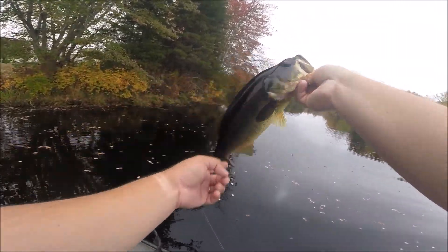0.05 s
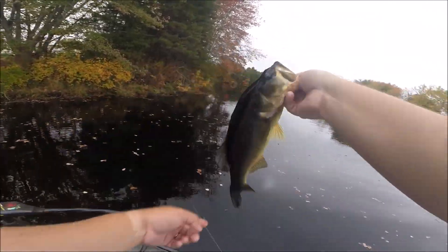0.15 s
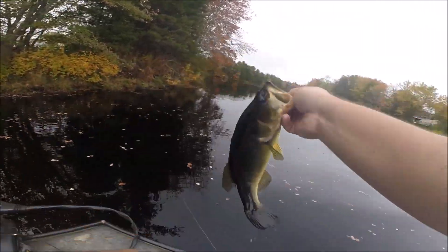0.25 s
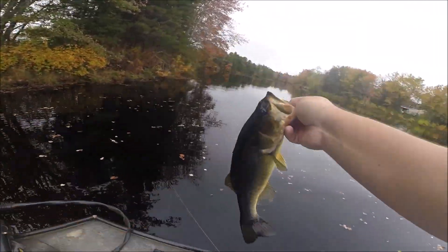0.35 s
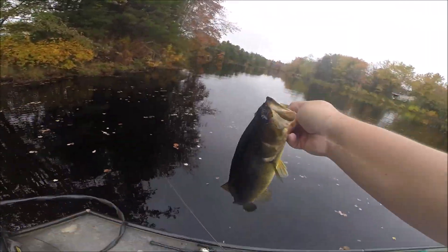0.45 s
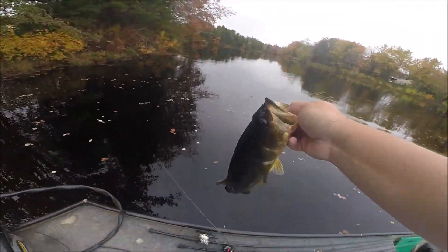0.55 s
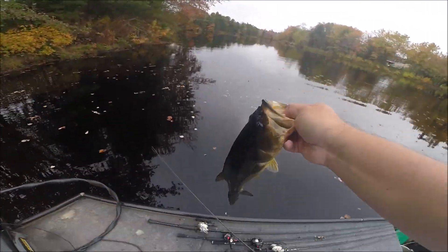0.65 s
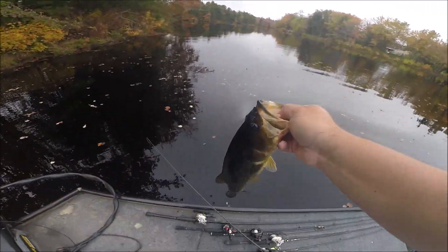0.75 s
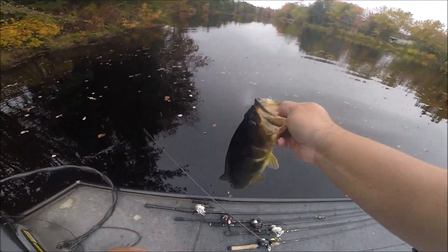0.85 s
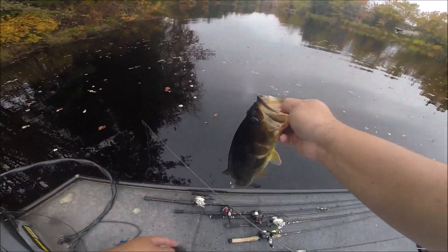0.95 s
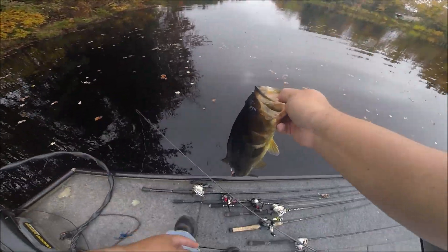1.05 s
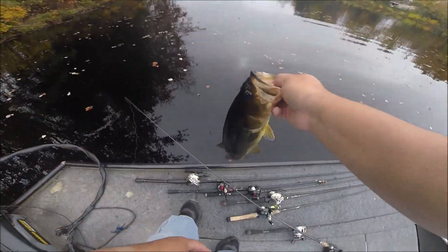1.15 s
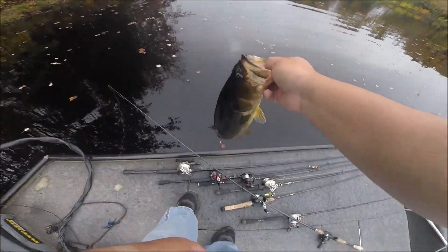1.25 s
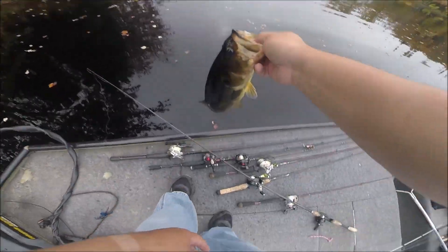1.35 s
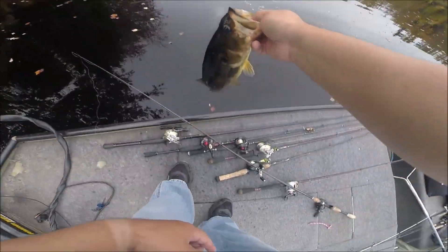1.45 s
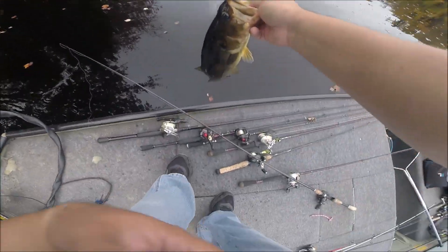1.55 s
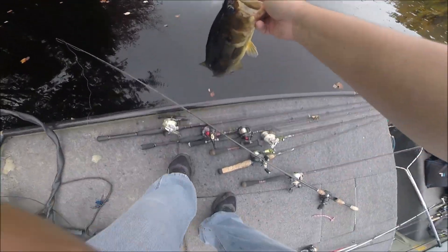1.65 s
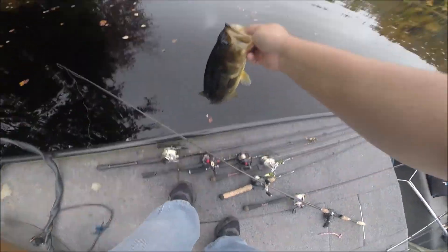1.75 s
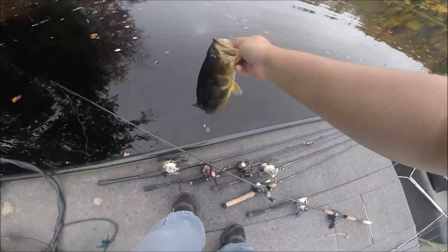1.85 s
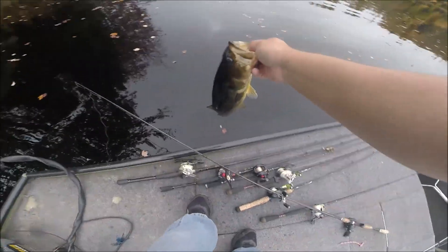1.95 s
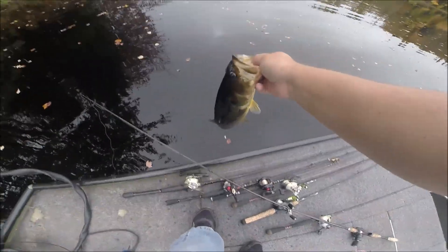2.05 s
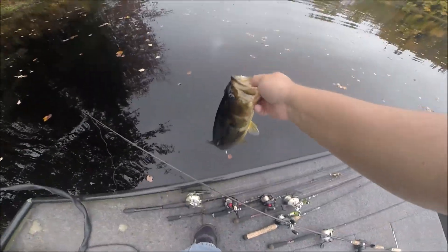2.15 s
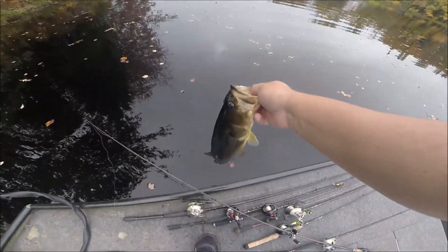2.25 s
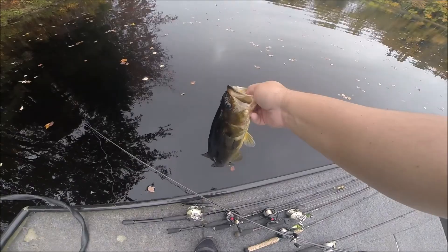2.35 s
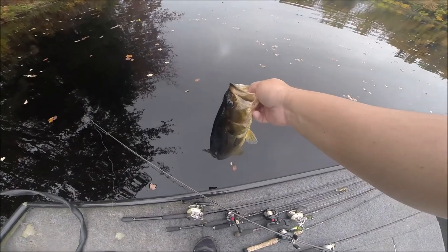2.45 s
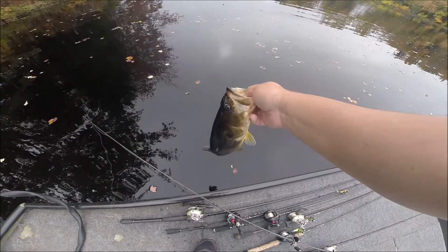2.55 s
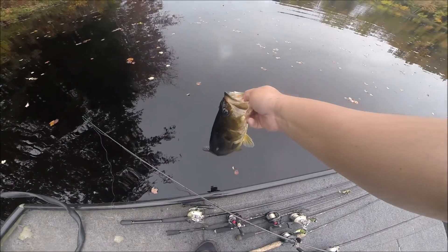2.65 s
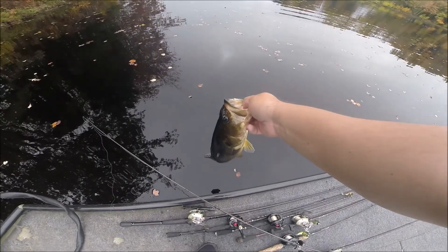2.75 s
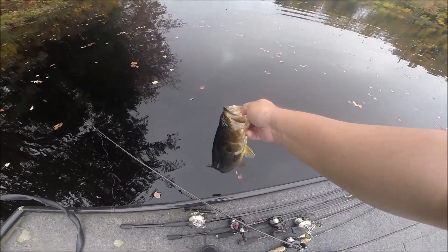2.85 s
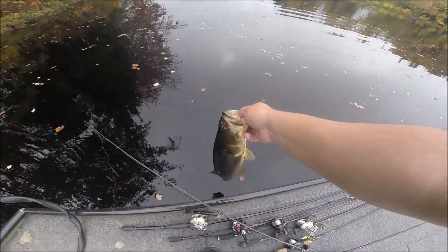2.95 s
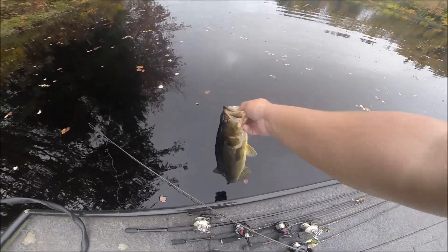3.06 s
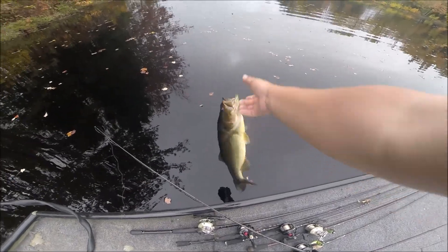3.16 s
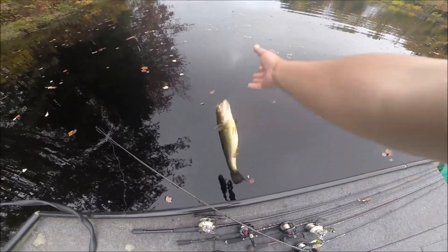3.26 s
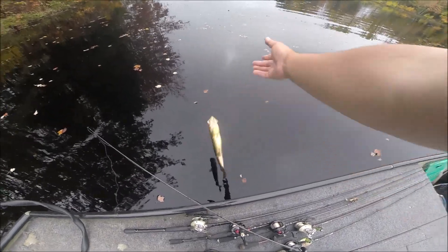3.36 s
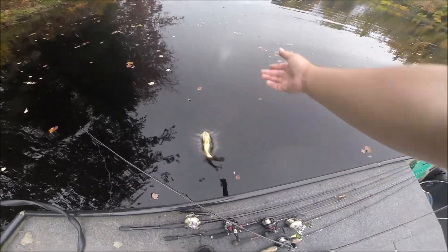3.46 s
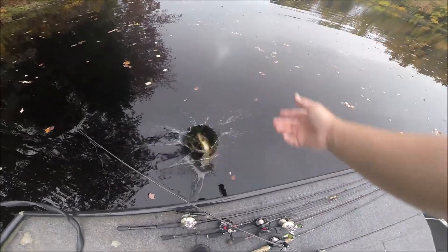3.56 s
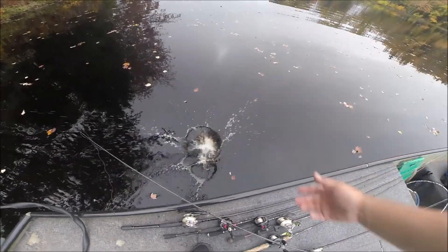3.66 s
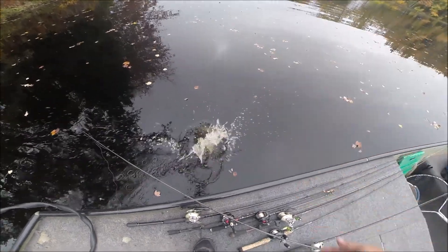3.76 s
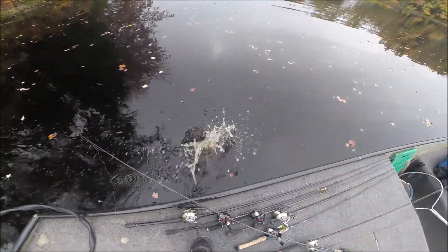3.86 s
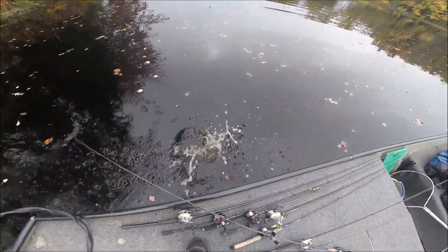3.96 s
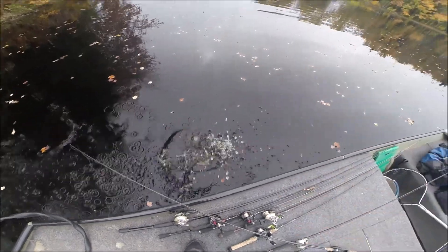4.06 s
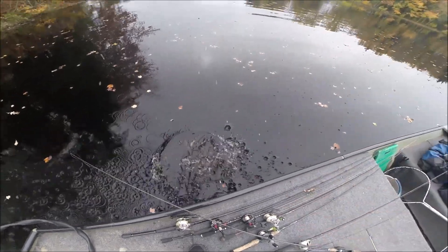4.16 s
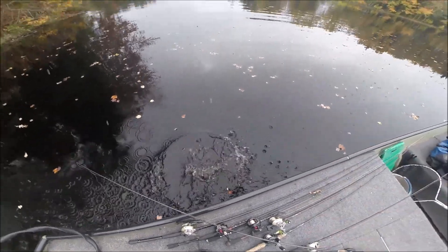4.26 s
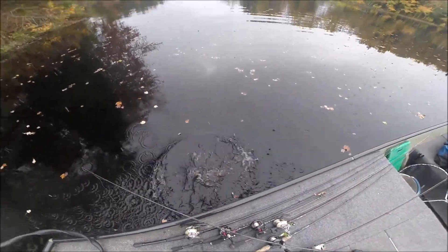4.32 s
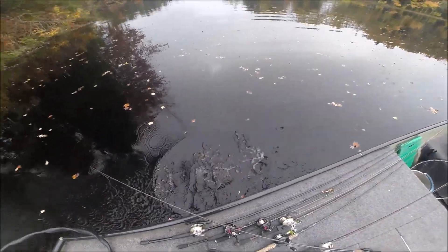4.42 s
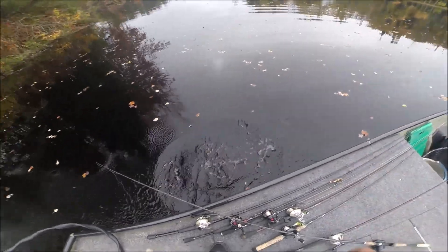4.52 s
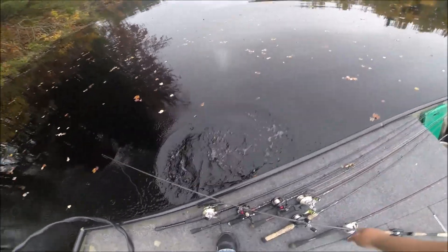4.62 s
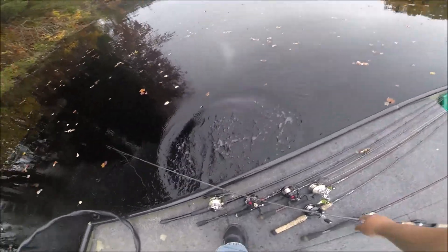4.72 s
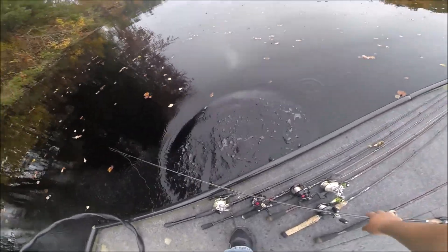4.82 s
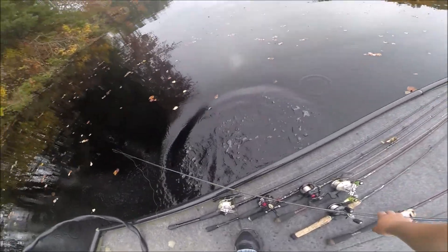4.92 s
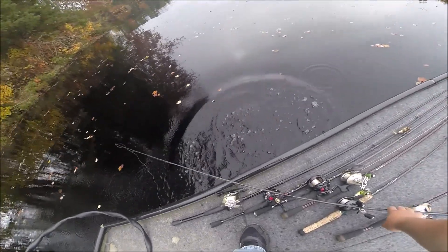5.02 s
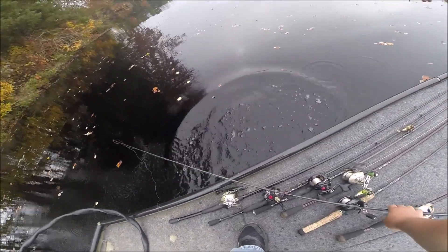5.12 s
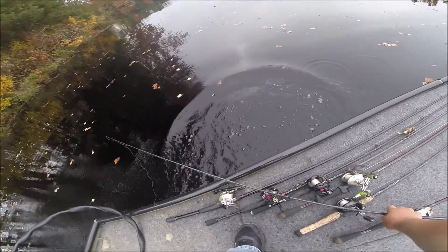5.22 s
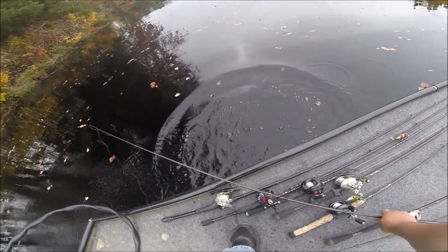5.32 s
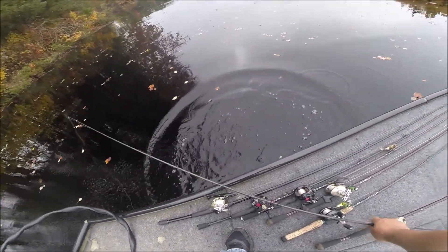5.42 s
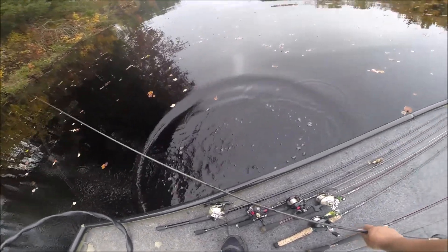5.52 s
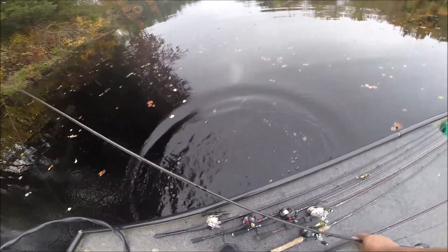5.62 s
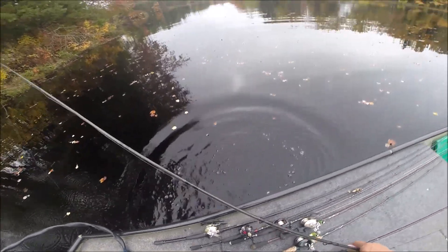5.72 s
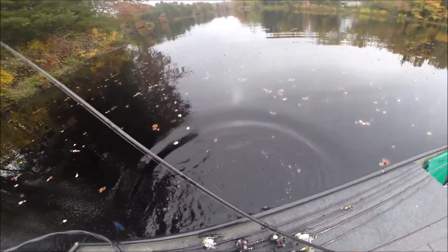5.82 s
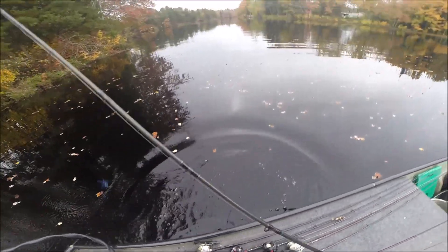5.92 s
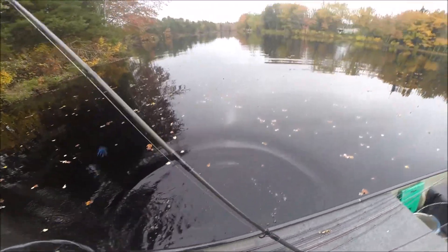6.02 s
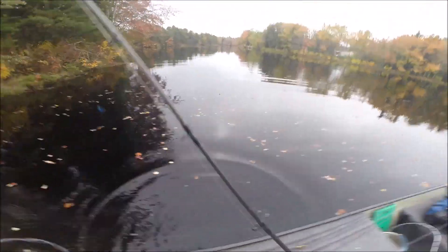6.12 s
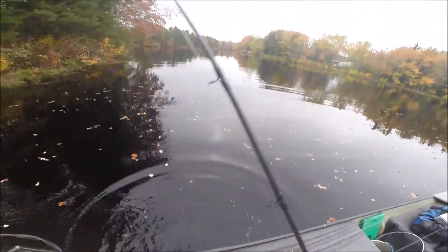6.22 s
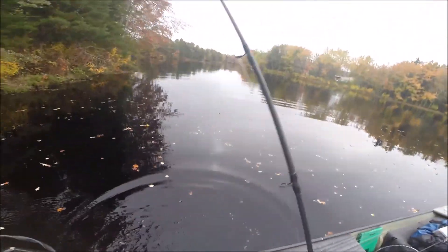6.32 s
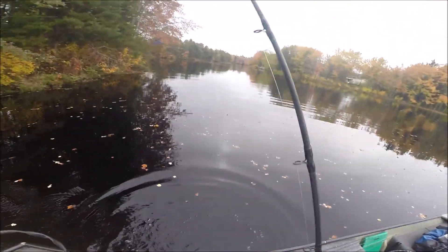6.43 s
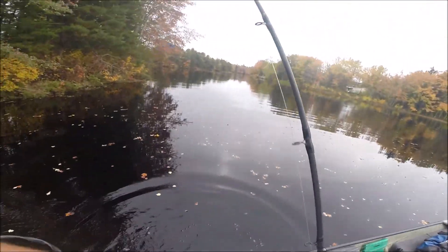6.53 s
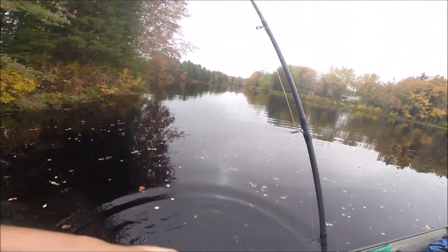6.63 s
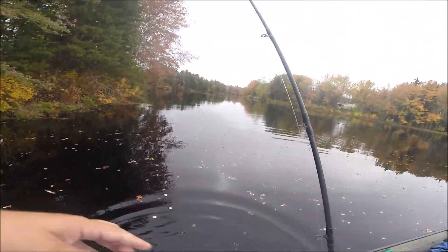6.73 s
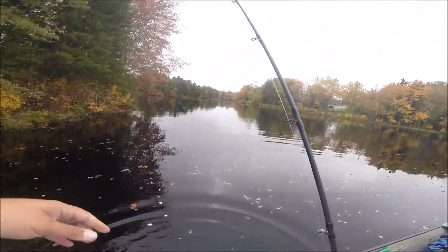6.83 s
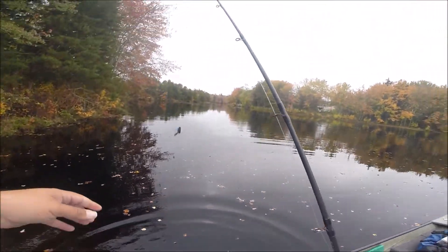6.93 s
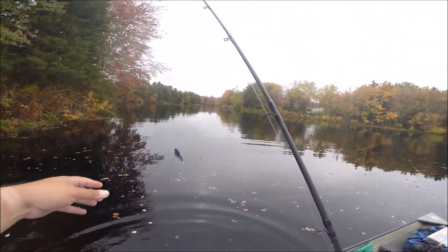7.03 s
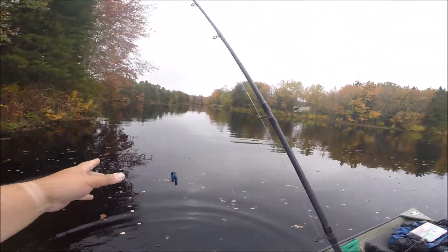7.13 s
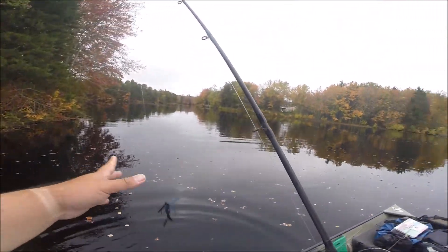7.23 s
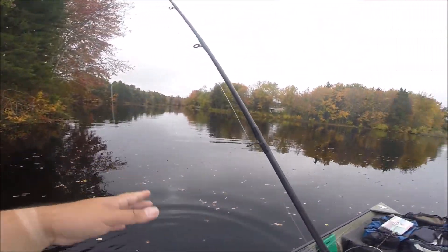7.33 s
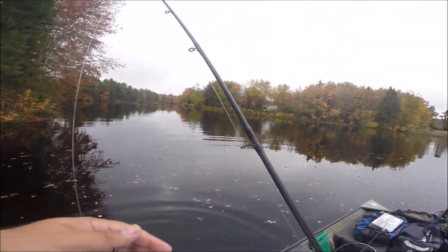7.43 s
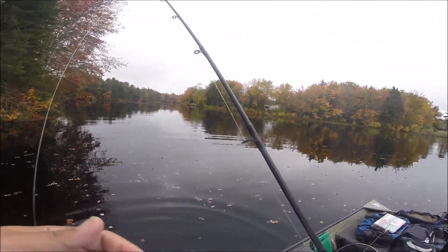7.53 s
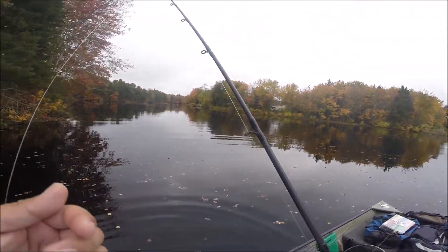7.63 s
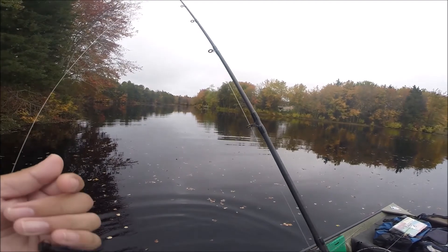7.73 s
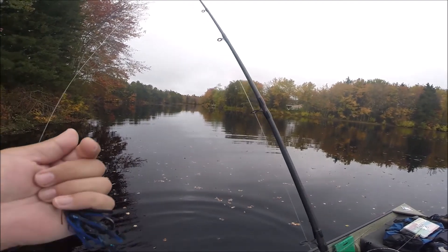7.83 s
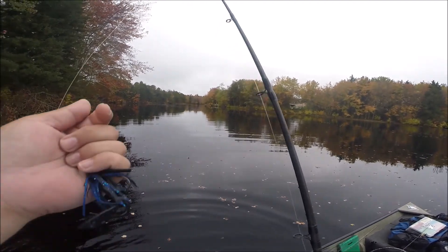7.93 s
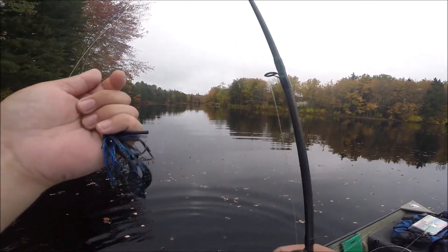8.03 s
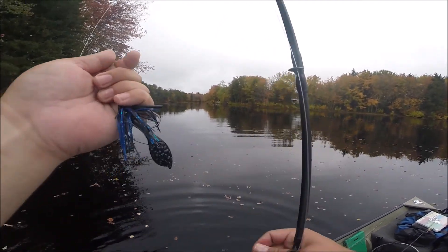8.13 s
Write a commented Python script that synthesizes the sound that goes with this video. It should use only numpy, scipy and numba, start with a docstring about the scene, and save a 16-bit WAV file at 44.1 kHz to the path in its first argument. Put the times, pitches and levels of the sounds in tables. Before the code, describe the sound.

A fish slaps into a still pond with one sharp splash and pattering drops, amid camera bumps, deck knocks and a chirping cricket.

```python
"""On a small boat on a still pond, with a body-worn camera's microphone: a bass is let go beside the boat.
It slaps the surface (noise cracks and squeezed air), drags down a pocket of air that claps shut and rings
(damped swings), and a jet of water rises and patters back (drops over shaped noise). The wearer nudges the
camera (low thumps, rubbing hiss), feet and tackle knock on the deck (thuds, ringing clicks), and a cricket
chirps on the bank (a pulsed tone) over quiet open air (shaped noise)."""
import sys
import numpy as np
from scipy import signal
from scipy.fft import rfft, irfft, next_fast_len
from scipy.io import wavfile
from scipy.ndimage import uniform_filter1d
from numba import njit

SR = 44100
rng = np.random.default_rng(int(sys.argv[2]) if len(sys.argv) > 2 else 0)


def put_to_file(sound):
    """Save the sound as 16-bit audio at rate SR, in the file named by the first command-line argument."""
    columns = np.atleast_2d(sound).T  # one column per channel
    safe = np.clip(columns, -1, 1)
    whole_steps = np.round(safe * 32767)
    wavfile.write(sys.argv[1], SR, whole_steps.astype(np.int16))


N = 360738
TIME = np.arange(N) / SR  # seconds
POCKET_S = 3.6725  # when the air pocket starts to ring


def undb(db):
    """Decibels to gain."""
    return 10 ** (np.asarray(db) / 20)


def unit(x):
    """Scale to rms 1."""
    return x / np.sqrt(np.mean(x ** 2))


def curves(table):
    """Each column of a table after the first, joined by straight lines in time."""
    s, *columns = np.transpose(table)
    return [np.interp(TIME, s, c) for c in columns]


def add(out, s, wave):
    """Mix a short wave in at s seconds."""
    i = max(int(s * SR), 0)
    out[i:i + len(wave)] += wave[:max(N - i, 0)]


def colour(x, spectrum):
    """Filter x by a curve of (Hz, dB) points joined over log frequency; rms 1."""
    hz, db = np.transpose(spectrum)
    size = next_fast_len(N)
    f = np.maximum(np.fft.rfftfreq(size, 1 / SR), 1)
    gain = undb(np.interp(np.log(f), np.log(hz), db))
    return unit(irfft(rfft(x, size) * gain, size)[:N])


@njit
def svf(x, g, k):
    """State-variable band-pass whose tuning g and damping k may move every sample."""
    y, b, l = np.empty(len(x)), 0., 0.
    for i in range(len(x)):
        v = (b + g[i] * (x[i] - l)) / (1 + g[i] * (g[i] + k[i]))
        b, l, y[i] = 2 * v - b, l + 2 * g[i] * v, k[i] * v
    return y


def band(x, hz, width):
    """A resonance with gain 1 at its centre; centre and width in Hz."""
    hz = np.minimum(hz, .45 * SR) * np.ones(len(x))
    return svf(x + 1e-18, np.tan(np.pi * hz / SR), width / hz)


def narrow_noise(hz, width):
    """Noise through the same resonance twice; rms 1."""
    once = band(rng.standard_normal(N), hz, width)
    return unit(band(once, hz, width))


def walk(rate):
    """Slow chance: random levels, `rate` a second, smoothed twice; rms 1."""
    k = max(int(SR / rate), 1)
    levels = np.repeat(rng.standard_normal(N // k + 1), k)
    return unit(uniform_filter1d(uniform_filter1d(levels, k), k)[:N])


def envelope(start, hold, attack, release):
    """Exponential rise up to `start`, a hold, and an exponential fall; all in seconds."""
    rising = np.minimum((TIME - start) / attack, 0)
    falling = np.maximum(TIME - start - hold, 0) / release
    return np.exp(np.maximum(rising - falling, -30))


def ping(hz, cycles, rise, glide, phase=0):
    """A damped swing that peaks after `rise` cycles, falls by 1/e in `cycles` and slides in pitch."""
    turn = np.arange(int((rise + 6 * cycles) * SR / hz) + 2) * hz / SR
    swell = np.sin(np.pi / 2 * np.minimum(turn / rise, 1)) ** 2
    after = turn - rise
    decay = np.exp(-np.maximum(after, 0) / cycles)
    sliding = after + glide * after ** 2 / (2 * cycles)
    return swell * decay * np.cos(2 * np.pi * sliding + phase)


def burst(hz, decay, spread):
    """A brief impact: dying noise round a centre frequency."""
    t = np.arange(2048) / SR
    return band(rng.standard_normal(len(t)) * np.exp(-t / decay), hz, hz * spread)


def air():
    """Quiet open air: shaped noise with a restless low end, and faint rustles and hums that swell and fade."""
    # The spectrum of the open air. Each row: frequency in Hz, relative level in dB.
    air_colour = [(12, -34), (20, -9), (80, -2.5), (112, -6.5), (213, -7), (238, -9.5), (274, -10),
                  (614, -18.5), (686, -20.5), (788, -20.5), (1540, -25.5), (4680, -35), (5380, -34.5),
                  (6020, -38.5), (15500, -53.5)]
    # Faint rustles and hums. Each row: peak in seconds, half length in seconds, centre in Hz,
    # width in Hz, level in dB.
    faint = [(0.223, 0.11, 8550, 1800, -64), (0.94, 0.023, 496, 151, -50), (1.5, 0.28, 300, 315, -54),
             (1.858, 0.095, 5200, 3000, -67), (6.303, 1.84, 692, 25.2, -64), (6.42, 0.18, 860, 220, -60.5),
             (7.002, 0.26, 1520, 180, -64), (7.95, 0.42, 12600, 1490, -76)]
    wash = colour(rng.standard_normal(N), air_colour) * undb(-49 + 0.32 * walk(0.55))
    restless = band(wash, 120, width=38) * (undb(0.94 * walk(8.2)) - 1)
    swells = sum(undb(db) * np.exp(-((TIME - s) / length) ** 2) * narrow_noise(hz, width)
                 for s, length, hz, width, db in faint)
    return wash + restless + swells


def crickets():
    """One cricket on the bank pulses a wing tone evenly, over a thin chorus of noise near the same note."""
    # The near cricket, louder and softer as the wearer turns.
    # Each row: time in seconds, level in dB before the trim below.
    near = [(0, -57.5), (1.35, -55), (1.7, -58.5), (3.0, -55.5), (3.1, -67), (6.3, -76), (7.0, -57),
            (8.18, -67.5)]
    db, = curves(near)
    rate, first_s, chirp_s = 9.617, .066, .011  # chirps a second, first centre, Gaussian spread
    offset = (((TIME - first_s) * rate + .5) % 1 - .5) / rate  # seconds from the nearest chirp
    chirp = np.exp(-(offset / chirp_s) ** 2 / 2)
    wing_hz = 5285 + 18 * walk(400)
    wing = np.sqrt(2) * np.sin(2 * np.pi * np.cumsum(wing_hz) / SR)
    level = undb(db - 3.5 + walk(60) + 2.3 * walk(11))
    chorus = undb(-70.5) * narrow_noise(5370, width=520)
    return level * chirp * wing + chorus


def cloth():
    """Cloth rubs on the camera: uneven hiss over a dull drag, with a narrow whistling resonance."""
    # Strokes. Each row: start of the hold in seconds, its length in seconds, hiss level in dB,
    # whistle in dB relative to the hiss.
    strokes = [(0.12, 0.18, -56.5, -15), (0.908, 0.036, -59, -8), (1.75, 0.12, -53, -16.5),
               (2.04, 0.16, -60, -8), (5.5, 0.74, -70, -2), (6.26, 0.22, -62.5, -19),
               (7.608, 0.73, -55, -7)]
    # The spectrum of the rubbing hiss. Each row: frequency in Hz, relative level in dB.
    rub_colour = [(200, -5), (600, 8), (950, 8), (1400, -3), (2800, -5), (4500, -4), (6500, -12),
                  (8700, -14.5), (11000, -16), (13000, -19), (16000, -25)]
    hiss = colour(rng.standard_normal(N), rub_colour)
    whistle = narrow_noise(1980, width=120)
    drag = narrow_noise(60, width=103)
    out = np.zeros(N)
    for s, length, db, whistle_db in strokes:
        drag_db = 15.0 + 0.56 * whistle_db  # the harder it presses, the more it whistles and drags
        rubbing = hiss + undb(whistle_db) * whistle + undb(drag_db) * drag
        out += undb(db) * envelope(s, length, attack=0.072, release=0.068) * rubbing
    return out * undb(2.23 * walk(40))


def thud(hz, db, phase, knock_phase):
    """A heavily damped swing; the harder the push, the more it stirs higher, shorter knocks."""
    # Each row: multiple of the pitch, dB gained per dB of push, level in dB for a push of 0 dB.
    knocks = [(2.0, 1.54, -6.5), (3.1, 2.95, -9)]
    swing = undb(db) * ping(hz, cycles=0.62, rise=0.936, glide=-0.031, phase=np.pi * phase)
    for multiple, growth, knock_db in knocks:
        knock = ping(hz * multiple, cycles=0.8, rise=1.03, glide=-0.022, phase=np.pi * knock_phase)
        delay = (1 - 1 / multiple) * .9 / hz  # lines the knock's peak up near the swing's
        add(swing, delay, undb(growth * db + knock_db) * knock)
    return swing


def thumps():
    """Feet thud on the deck; nudges rock the camera mount, and a longer one sticks and slips a few times."""
    # Nudges of the mount. Each row: time in seconds, push in dB before the trim below,
    # judder length in seconds.
    nudges = [(0.121, -26.5, .05), (0.276, -23, .06), (0.391, -29, 0), (.484, -29.5, 0), (2.222, -21, .025),
              (2.801, -33, 0), (3.41, -37.5, .04), (4.809, -21.5, .06), (4.905, -30.5, 0), (5.6, -26, 0),
              (5.677, -31, .05), (5.868, -33, .03), (6.047, -33, 0), (6.118, -32, 0), (7.558, -14.5, 0),
              (7.606, -8, .022), (7.821, -18.5, 0), (7.912, -10, .022), (7.98, -16.5, .03), (8.041, -12, 0),
              (8.094, -9.5, 0), (8.112, -7, 0), (8.136, -8, .022)]
    # Feet shifting on the deck. Each row: time in seconds, pitch in Hz, push in dB before the trim below.
    steps = [(0.938, 135, -38), (1.247, 131, -31), (1.693, 118, -31.5), (1.742, 123, -26.5),
             (1.863, 82, -32.5), (1.955, 212, -14), (2.185, 146, -18)]
    # the mount stiffens when pushed: its pitch at a reference push, and the dB that raise it an octave
    mount_hz, reference_db, db_per_octave = 107.8, -20, 15.5
    out, rise = np.zeros(N), .9  # rise in cycles
    for (s, db, length), chance in zip(nudges, rng.uniform(-1.01, 1, (len(nudges), 6, 3))):
        hz = mount_hz * 2 ** ((db - reference_db) / db_per_octave)
        delay = 0
        for gap, size, phase in chance:
            if delay <= length:
                slip_db = db - 2.0 + (delay > 0) * (2 * size - 1)
                add(out, s + delay - rise / hz, thud(hz, slip_db, phase, gap))
                delay += (1.6 + 0.22 * gap) / hz
    # the whole camera sways slowly while it is being pushed
    push = np.sqrt(uniform_filter1d(out ** 2, 2000).clip(0))
    sway = narrow_noise(45, width=70)
    for (s, hz, db), phases in zip(steps, rng.uniform(-1, 1, (len(steps), 2))):
        add(out, s - rise / hz, thud(hz, db - 1.5, *phases))
    return out + undb(-4) * push * sway


def clicks():
    """Tackle knocks: hard contacts with a trace of chatter ring several short resonances."""
    # Contacts. Each row: time in seconds, peak in dB, centre in Hz, chatter decay in seconds.
    contacts = [(.923, -39.5, 1000, .004), (1.698, -37, 1010, .004), (1.766, -17.5, 2940, 0.002),
                (1.953, -27, 2500, 0.0018), (2.0145, -11, 2680, 0.0017), (2.18, -35, 3500, 0.0031),
                (4.481, -37, 4400, .0028), (4.493, -29, 8350, 0.0024), (4.611, -31, 9400, .0018),
                (4.718, -39, 11200, .001), (6.499, -30, 5970, 0.0019), (6.959, -34.5, 1610, .002)]
    # What the tackle rings with. Each row: frequency in Hz, width in Hz, gain in dB.
    modes = [(860, 240, 12.5), (1680, 1600, 0), (2500, 280, 2), (4400, 440, -1), (5620, 790, 2),
             (7900, 9900, -12), (11700, 1600, -5)]
    out, t = np.zeros(N), np.arange(2048) / SR
    for s, db, hz, decay in contacts:
        chatter = 0.12 * rng.standard_normal(len(t)) * np.exp(-t / decay)
        contact = band((t == 0) + chatter, hz, hz * 0.88)
        ring = sum(undb(mode_db) * band(contact, mode_hz, width) for mode_hz, width, mode_db in modes)
        add(out, s, undb(db) * ring / np.abs(ring).max())
    return out


def surges():
    """Strength of the thrown water and of its fine mist; the surges add in power."""
    # Surges of flying and falling water, in order: the fish breaks the surface, the hollow claps shut,
    # a jet shoots up, the lightest specks land, heavier drops follow, the tip of the jet falls back,
    # then its body, a last fine drizzle. Each row: peak in seconds, level in dB, rise in seconds,
    # decay in seconds, mist in dB relative to that level.
    thrown = [(3.518, -33, 0.00042, 0.11, -1.5), (3.676, -18, 0.024, 0.01, -9),
              (3.685, -30.5, 0.027, 0.081, -6), (3.894, -50.5, 0.0026, 0.024, 14),
              (3.97, -41.5, .07, 0.11, -8), (4.102, -34, 0.038, 0.065, -2.5),
              (4.15, -36.5, 0.05, 0.071, 2.5), (4.5, -66, 0.32, 0.27, 10.5)]
    water, mist = 0, 0
    for s, db, rise, decay, mist_db in thrown:
        water = water + (undb(db) * envelope(s, 0, rise, decay)) ** 2
        # mist dies sooner than the drops
        mist = mist + (undb(db + mist_db) * envelope(s, 0, rise, decay * 0.93)) ** 2
    drop_treble = water * undb(-2.5) ** 2  # the treble that the drops keep
    return np.sqrt(water), np.sqrt(mist + drop_treble)


def hollow(flow):
    """Churning water sounds the open hollow: its note sinks as it deepens, climbs as it fills; it gulps."""
    # The hollow deepening, then filling. Each row: time in seconds, resonance in Hz.
    resonance = [(3.55, 500), (3.65, 272), (4.04, 230), (4.12, 283), (4.19, 560)]
    hz, = curves(resonance)
    out = undb(-6) * flow * narrow_noise(hz, width=166)
    # its last swing as it closes
    add(out, POCKET_S - .008, undb(-12.5) * ping(273, cycles=1.3, rise=1.38, glide=.01))
    return out


def spray(flow, mist_flow, count=7000):
    """Thousands of drops, each a tick or a tiny rising bubble, over the hiss of torn water."""
    # The spectrum of drops and hiss. Each row: frequency in Hz, relative level in dB.
    spray_colour = [(300, -15), (600, -21), (800, -7), (1100, -1.5), (1600, -7.5), (2400, -4), (4000, -7),
                    (6000, -13.5), (9000, -20), (15000, -23.5)]
    drops = np.zeros(N)
    for when, pitch, ring, size, phase in rng.random((count, 5)):
        hz = 650 * 20 ** (pitch ** .9)
        loudness = undb(-5 * np.log(0.017 + size))
        cycles = 1.04 + 7 * ring ** 2 * (hz / 3000) ** 0.46  # small bubbles ring for more cycles
        s = 3.5 - .75 * np.log(1 - when)
        add(drops, s, loudness * ping(hz, cycles, rise=1.09, glide=0.035, phase=2 * np.pi * phase))
    drops = colour(np.diff(drops, prepend=0) + 0.43 * drops, spray_colour)
    # levelled, so that thinning drops go from a wash to single plips
    drops /= np.sqrt(uniform_filter1d(drops ** 2, SR // 4).clip(1e-6))
    water = drops + undb(-8.5) * colour(rng.standard_normal(N), spray_colour)
    mist = signal.sosfilt(signal.butter(1, 5000, "high", fs=SR, output="sos"), water)
    clumps_db = 1.76 * walk(90)
    return undb(clumps_db + 0.17) * (flow * (water - mist) + mist_flow * mist)


def plips(flow, count=80):
    """Fat drops smack or trap a ringing bubble at random, their loudness following the flow within limits."""
    out, start_s, length_s = np.zeros(N), 3.53, .85
    for when, pitch, size, ring in rng.random((count, 4)):
        s = start_s + length_s * when
        hz = 900 * 4.5 ** (pitch ** 1.3)
        loudness = np.clip(flow[int(s * SR)], undb(-50), undb(-36)) * undb(11 - 9 * size)
        add(out, s, loudness * ping(hz, cycles=1.2 + 4 * ring ** 2, rise=0.58 + ring, glide=0.072))
    return out


def bubbles():
    """Single bubbles ring and rise in pitch as they near the surface; the big pocket booms under them."""
    # The largest single bubbles. Each row: peak in seconds, pitch in Hz, level in dB before the trim below.
    largest = [(3.5245, 860, -22), (3.5717, 920, -14), (3.6235, 2370, -21.5), (3.6448, 7500, -19.5),
               (3.7255, 1230, -24), (3.781, 2020, -22.5), (3.798, 1230, -27), (3.9386, 960, -28.5),
               (3.9634, 4430, -22.5), (4.035, 2540, -26.5), (4.1405, 2330, -26), (4.1801, 1000, -24.5),
               (4.1982, 2840, -24), (4.2124, 4470, -27), (4.235, 1830, -31), (4.401, 2360, -38.5)]
    out, rise = np.zeros(N), 2.5  # rise in cycles
    for s, hz, db in largest:
        add(out, s - rise / hz, undb(db - 1) * ping(hz, cycles=3.8, rise=rise, glide=0.031))
    pocket_hz, pocket_db, decay_s = 136, -20, 0.039
    boom = ping(pocket_hz, cycles=pocket_hz * decay_s, rise=0.53, glide=0.0068)
    add(out, POCKET_S, undb(pocket_db) * boom)
    return out


def slaps():
    """The body hits, then the walls of the hollow clap together: each blow cracks and squeezes air."""
    # Sheets of water hitting. Each row: start in seconds, level in dB before the trims below,
    # centre in Hz, crack decay in seconds.
    blows = [(3.5192, -22, 2760, 0.0011), (3.6556, -8, 3510, 0.0016), (3.6673, -9.5, 2500, 0.003),
             (3.6709, 0, 977, 0.00097), (3.675, -7.5, 3360, 0.0028), (3.678, -4.5, 1220, 0.0037),
             (3.685, -12, 1820, 0.001)]
    no_lows = signal.butter(4, 750, "high", fs=SR, output="sos")  # thin sheets of water radiate no lows
    out = np.zeros(N)
    for s, db, hz, decay in blows:
        crack = signal.sosfilt(no_lows, burst(hz, decay, spread=.8))
        squeezed_air = ping(hz, cycles=hz * decay * 0.66, rise=1.09, glide=0.018, phase=np.pi / 2)
        add(out, s, undb(db - 9.0) * crack / np.abs(crack).max())
        add(out, s, undb(db - 1) * squeezed_air)
    return out


def scene():
    """The pond, handling sounds and the splash beside the boat, at one microphone."""
    flow, mist_flow = surges()
    background = air() + crickets()
    handling = cloth() + thumps() + clicks()
    splash = hollow(flow) + spray(flow, mist_flow) + plips(flow) + bubbles() + slaps()
    return (background + handling + splash)[None]


def record(dry):
    """The camera clips at full scale, then cuts the treble above 15.5 kHz."""
    low_pass = signal.ellip(8, .2, 70, 15500, fs=SR, output="sos")
    return signal.sosfilt(low_pass, np.clip(dry, -1, 1))


dry = scene()
out = record(dry)
put_to_file(out)
```